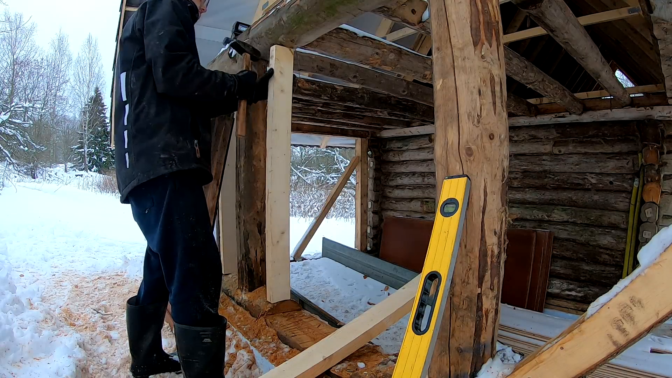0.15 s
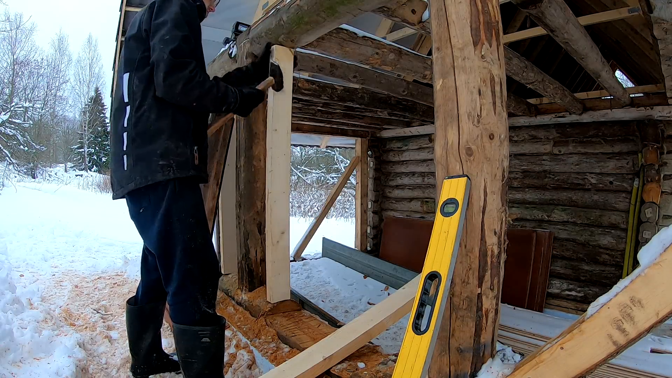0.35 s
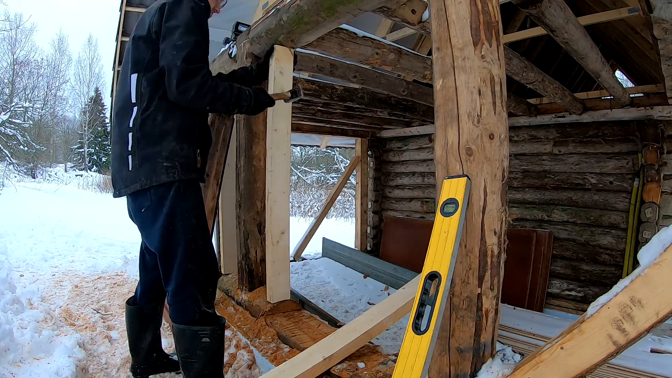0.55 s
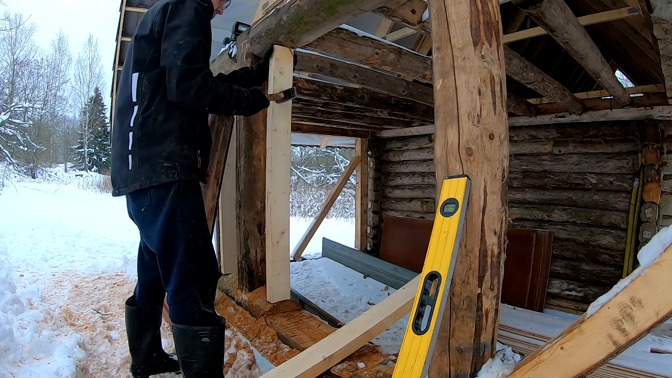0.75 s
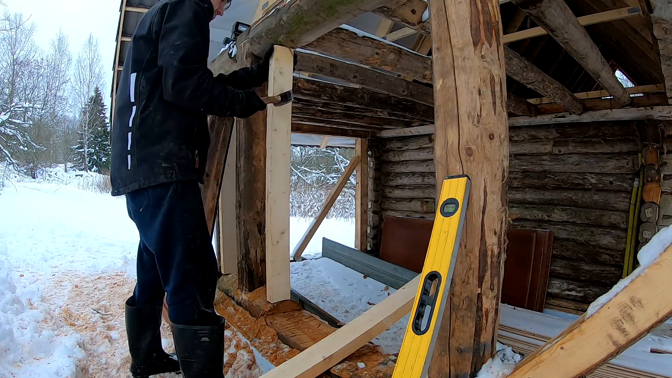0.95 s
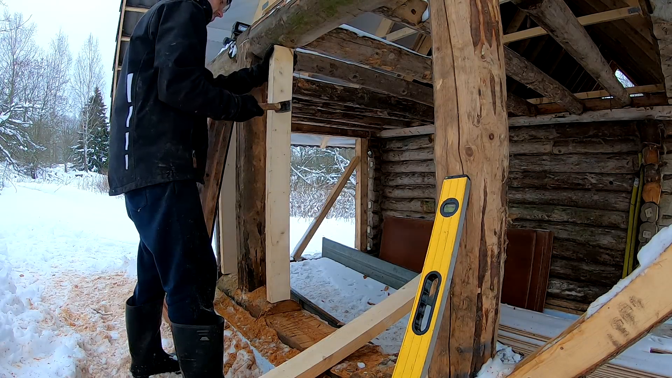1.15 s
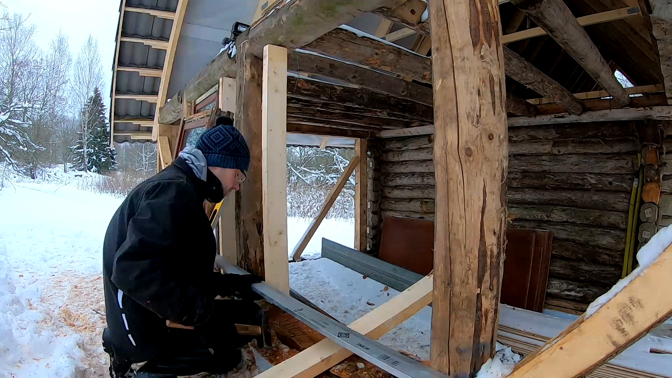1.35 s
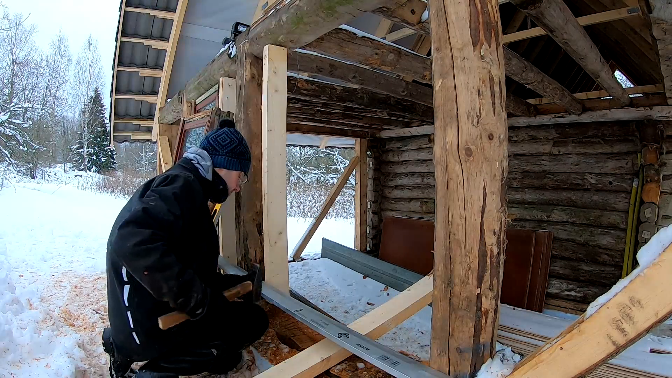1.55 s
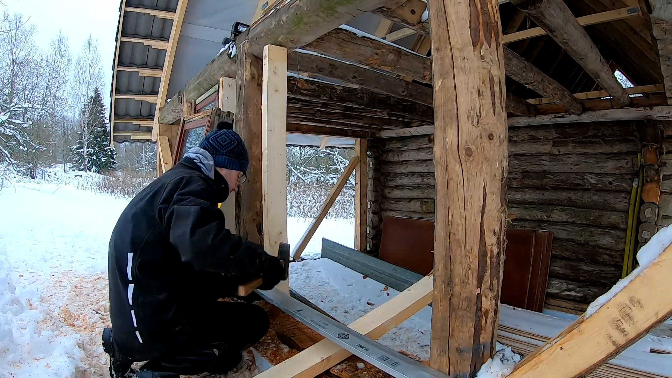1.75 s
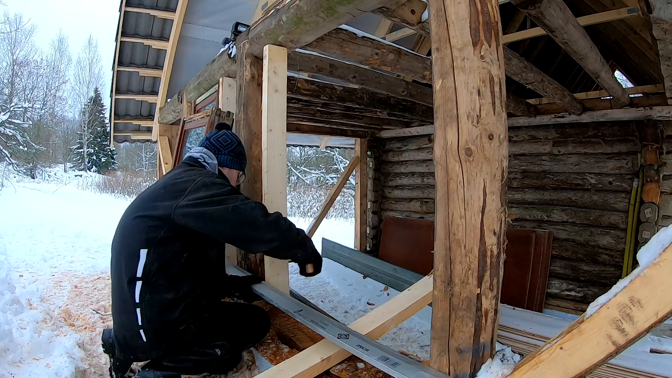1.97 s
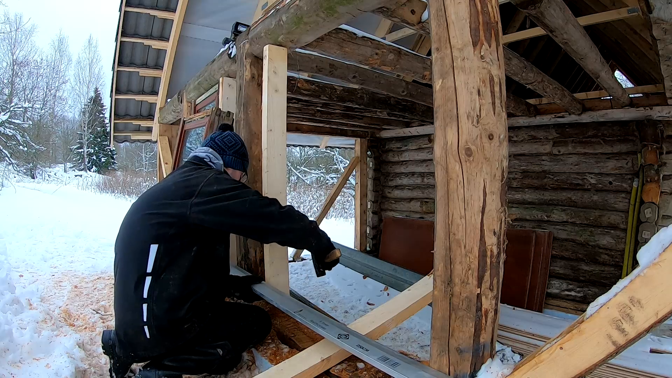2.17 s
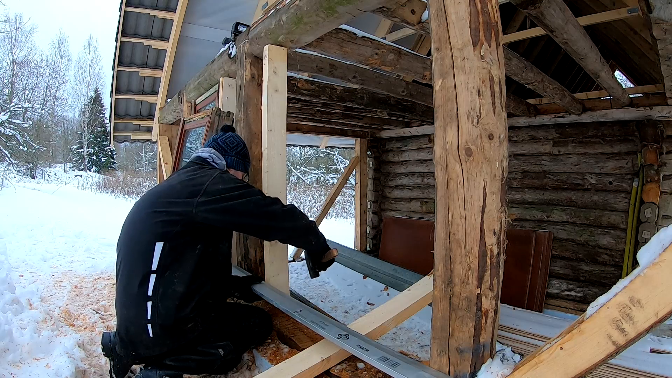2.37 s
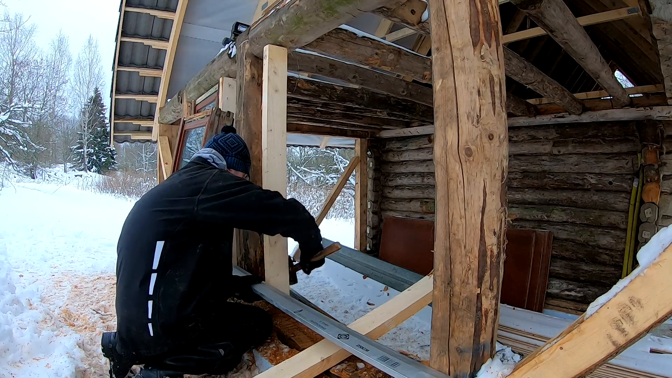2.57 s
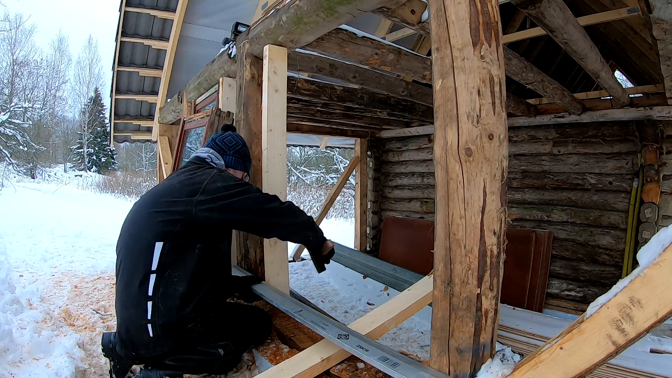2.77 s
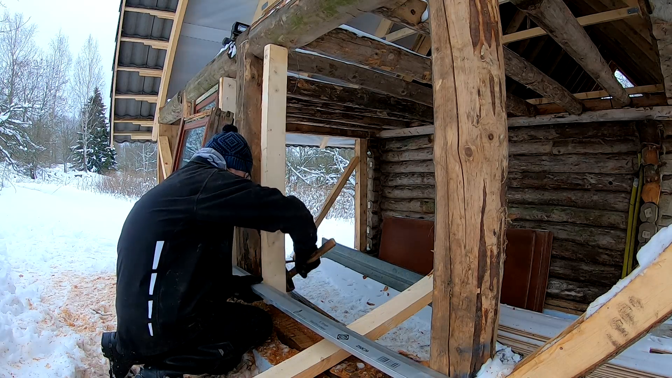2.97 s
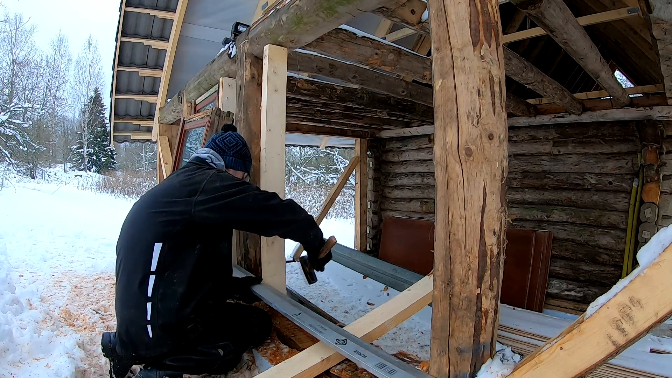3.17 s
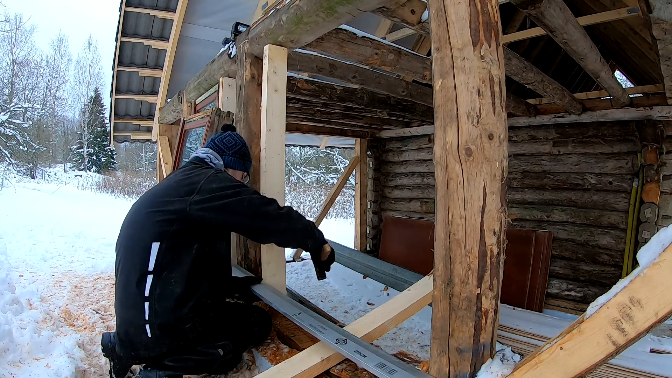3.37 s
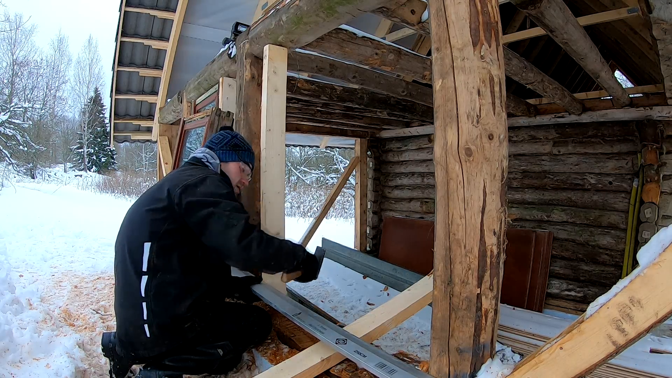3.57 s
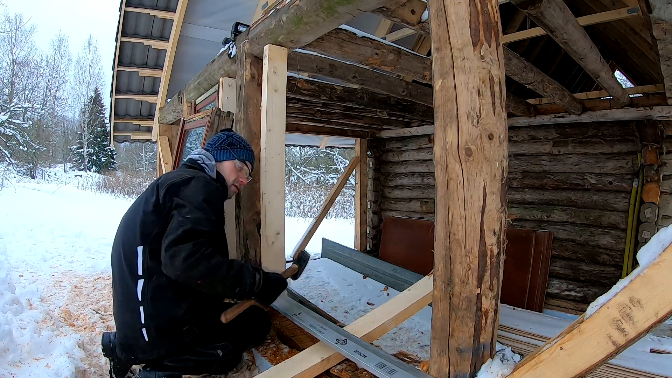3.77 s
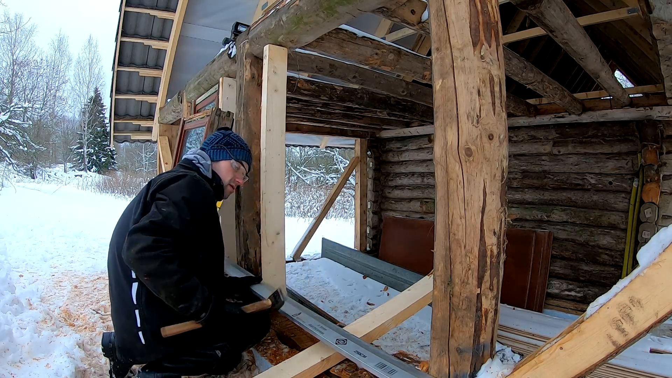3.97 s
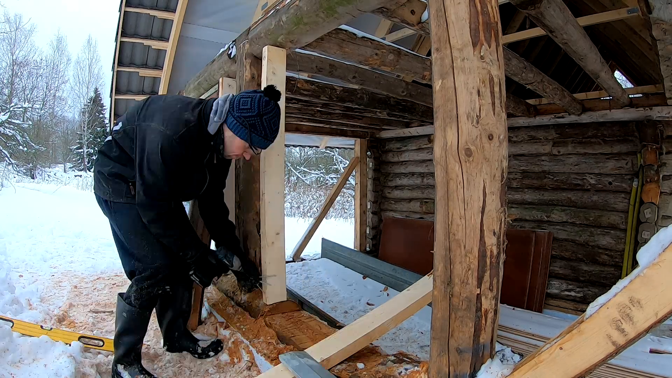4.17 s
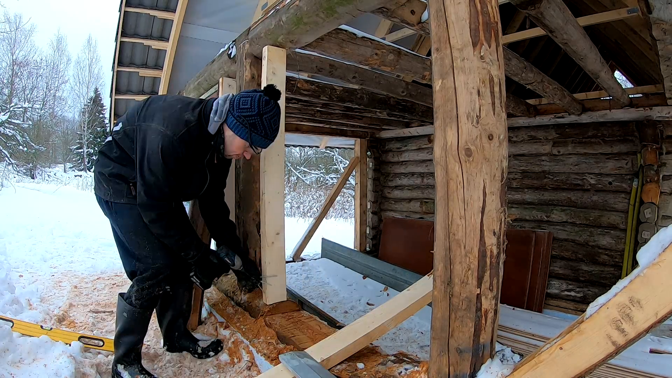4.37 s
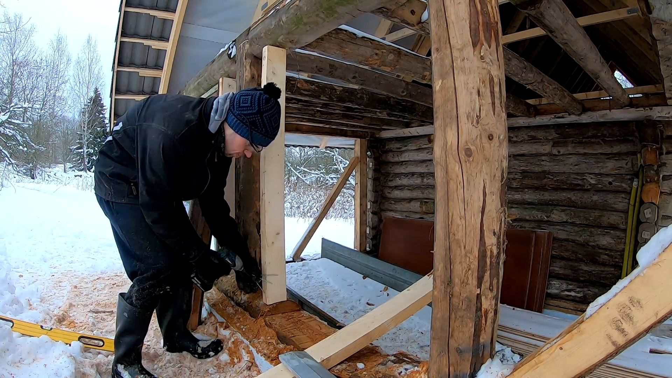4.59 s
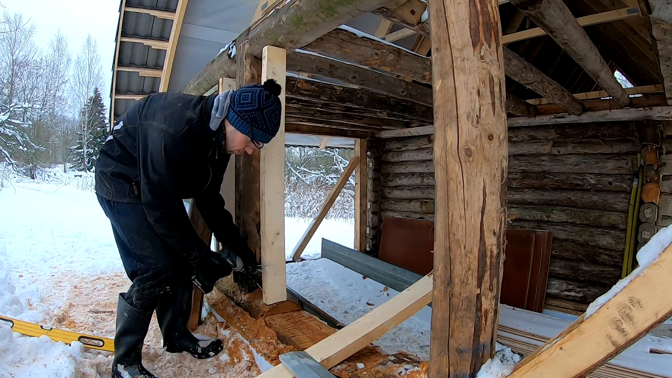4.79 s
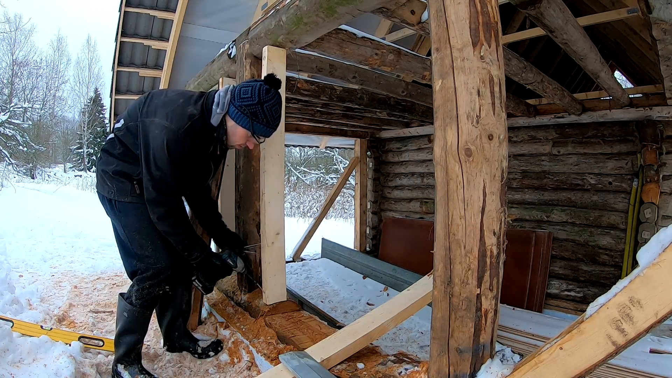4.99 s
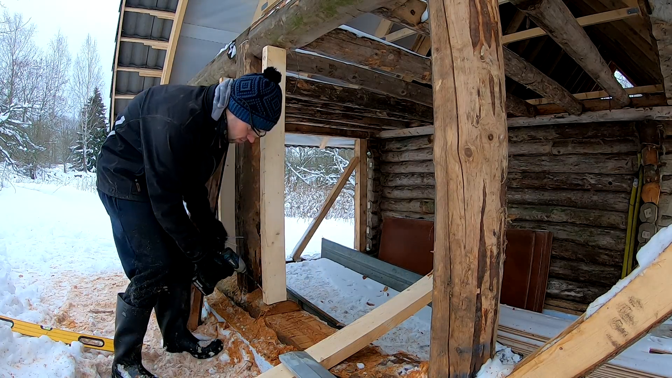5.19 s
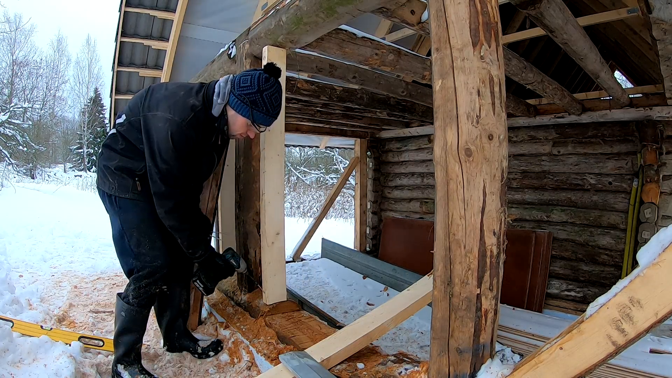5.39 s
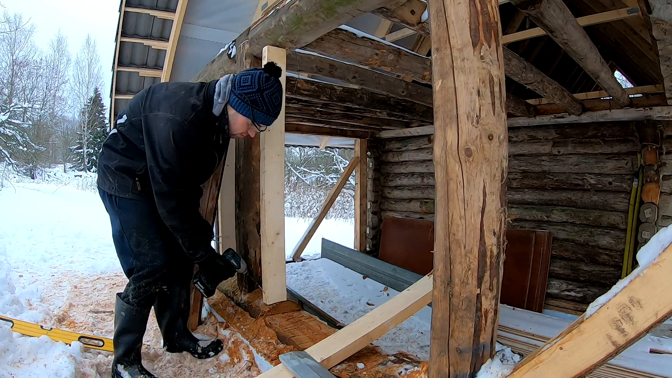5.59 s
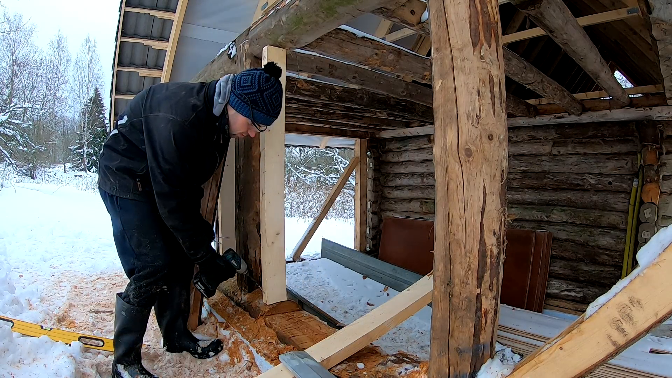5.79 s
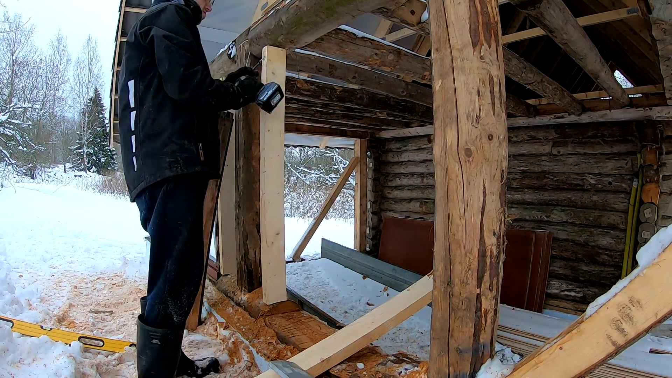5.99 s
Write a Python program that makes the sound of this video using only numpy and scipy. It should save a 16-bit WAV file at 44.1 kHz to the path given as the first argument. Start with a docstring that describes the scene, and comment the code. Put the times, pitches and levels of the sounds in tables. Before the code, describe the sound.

Hammer taps and two heavy blows ring on a timber post, then a cordless impact driver rattles harshly in an open shed with wind rumble.

```python
"""An open log shed, heard through a two-port microphone, where a timber post is hammered into place.
Two light taps and two heavy blows, with small knocks between, ring decaying timber modes and shed noise.
Then a cordless impact driver rattles with a saw-like rasp: repeated strikes and gear noise through
wood resonances, in one long run and the start of another. Shaped noise makes the wind rumble on the
microphone, the swish of a winter jacket as the builder moves, and hollow gliding rushes."""
import sys
import numpy as np
from scipy import signal
from scipy.fft import rfft, irfft, next_fast_len
from scipy.io import wavfile
from scipy.ndimage import uniform_filter1d, map_coordinates

SR = 44100
rng = np.random.default_rng(int(sys.argv[2]) if len(sys.argv) > 2 else 0)


def materialize(psi):
    """Save the field psi as 16-bit PCM at rate SR to the path in sys.argv[1].

    A 1-D psi becomes a single channel; in a 2-D psi each row is a channel.
    """
    bounded = np.clip(np.atleast_2d(psi).T, -1, 1)
    quanta = np.round(bounded * 32767).astype(np.int16)
    wavfile.write(sys.argv[1], SR, quanta)


N = 266364

# how the two microphone ports differ: (time [s], left-right level of the wind [dB], unlike share [0-1])
PORTS = [(0, 11, 1), (.7, 7, 1), (1.36, 3, 1), (1.42, 0, 0)]
RESTART_S = 5.953  # the driver's gears spin up again
REBOUND_S, REBOUND_DB = 0.0025, -5  # the tool's hammer bounces once on the anvil


def amp(db):
    """Decibels to amplitude."""
    return 10 ** (np.asarray(db) / 20)


def unit(x):
    """Scale to rms 1."""
    return x / np.sqrt(np.mean(x ** 2) + 1e-20)


def along(points, hz):
    """Read (frequency [Hz], value) points on a log frequency axis."""
    f, v = np.transpose(points)
    return np.interp(np.log(hz + 1), np.log(f + 1), v)


def curves(rows):
    """One value per sample for each column after the time."""
    s, *cols = np.transpose(rows)
    return [np.interp(np.arange(N) / SR, s, c) for c in cols]


def add(track, s, sound):
    """Lay a sound into a track at a time."""
    room = track[..., max(round(s * SR), 0):][..., :sound.shape[-1]]
    room += sound[..., :room.shape[-1]]


def filtered(x, gain):
    """Multiply the spectrum of x by a gain of frequency."""
    m = next_fast_len(x.shape[-1] + 8192, True)
    spectrum = rfft(x, m) * gain(np.fft.rfftfreq(m, 1 / SR))
    return irfft(spectrum, m)[..., :x.shape[-1]]


def high_pass(x, corner_hz):
    """Keep what lies above the corner."""
    return filtered(x, lambda f: f ** 3 / (f ** 3 + corner_hz ** 3))


def body(x, gain_db, size=16384):
    """Pass x through a causal, minimum-phase body with the given dB response."""
    log_gain = np.maximum(gain_db(np.fft.rfftfreq(size, 1 / SR)), -120) * np.log(10) / 20
    cepstrum = irfft(log_gain)
    # folding the cepstrum forward in time makes the response causal
    cepstrum[1:size // 2] *= 2
    cepstrum[size // 2 + 1:] = 0
    response = irfft(np.exp(rfft(cepstrum)))
    return signal.fftconvolve(np.atleast_2d(x), response[None], axes=1)[:, :x.shape[-1]]


def noise(spectrum):
    """Coloured noise of rms 1."""
    return unit(filtered(rng.standard_normal(N), lambda hz: amp(along(spectrum, hz))))


def flutter(rate):
    """A smooth random curve, rate knots a second."""
    knots = rng.standard_normal(int(N * rate / SR) + 4)
    return map_coordinates(knots, [np.arange(N) * rate / SR])


def grit(size):
    """Fast random unevenness of rms 1, with grains so many samples long."""
    return unit(uniform_filter1d(rng.standard_normal(N), size=size))


def swell(s, spread_s):
    """A smooth bell-shaped rise and fall of height 1 around a time."""
    return np.exp(-.5 * ((np.arange(N) / SR - s) / spread_s) ** 2)


def wind(buffet_db=2, lumpy_db=2.0):
    """A breeze with short gusts buffets the microphone, at first mostly on the left port, later alike on both."""
    # the breeze: (time [s], rumble level [dB])
    breeze = [(0, -36), (1.0, -33), (2.3, -36), (3.3, -36), (4.15, -30), (5.05, -47), (5.8, -45.5),
              (6.04, -39)]
    # short gusts: (time [s], spread [s], lift [dB])
    gusts = [(0.66, 0.03, 7), (0.821, 0.031, 10), (1.369, 0.02, 7), (2.011, 0.023, 11), (2.567, 0.026, 9.5),
             (3.534, 0.038, 4), (3.93, 0.032, 3.5), (5.89, 0.075, 7)]
    # brief dips of the rumble: (time [s], change [dB])
    dips = [(0.983, -17), (1.466, -5.5), (2.88, -11.5), (3.15, -26), (4.2, -14)]
    # wind unlike at the two ports: (frequency [Hz], relative level [dB])
    buffet_colour = [(12, -36.5), (20, -5), (48, -2.5), (108, -1.5), (155, -9.5), (195, -16), (298, -23.5),
                     (334, -31.5), (1000, -56.5), (1300, -105), (2200, -120)]
    # rumble common to both ports: (frequency [Hz], relative level [dB])
    rumble_colour = [(12, -35.5), (20, -3.5), (64, 0.5), (146, -3), (213, -8), (326, -25), (437, -25.5),
                     (670, -36.5), (730, -35), (1200, -41.5), (1560, -48.5), (2640, -120)]
    t = np.arange(N) / SR
    # the rumble drops away for a while
    calm = (t > 4.155) & (t < 5.03)
    level = np.where(calm, -51, curves(breeze)[0])
    level = uniform_filter1d(level, size=400)
    level = level + sum(db * swell(s, spread_s) for s, spread_s, db in gusts)
    level = level + sum(db * swell(s, 0.02) for s, db in dips)
    pan, apart = curves(PORTS)
    buffet = amp(buffet_db) * np.sqrt(apart) * np.array([noise(buffet_colour), noise(buffet_colour)])
    rumble = np.sqrt(1 - apart) * noise(rumble_colour)
    return amp(level + lumpy_db * flutter(30) + np.outer([.5, -.5], pan)) * (buffet + rumble)


def jacket(side=0.61, bright_db=-11, crinkle_db=2.5):
    """Sleeves swish as soft cloth noise; a faster sleeve sounds brighter."""
    # arm and body movements: (time of fastest motion [s], spread [s], swish level [dB])
    swishes = [(0.01, 0.088, -62), (0.22, 0.078, -67), (0.485, 0.089, -65), (1.2, 0.16, -81),
               (1.467, 0.079, -69), (1.66, 0.043, -60), (1.778, 0.1, -75), (2.098, 0.19, -66),
               (2.635, 0.066, -57), (3.554, 0.072, -78), (3.792, 0.16, -73.5), (4.13, 0.12, -69.5)]
    # rubbing cloth: (frequency [Hz], relative level [dB])
    cloth_colour = [(410, -39), (700, -7.5), (867, -11), (1530, -10), (3020, -11), (4210, -14.5),
                    (5160, -23.5), (9350, -33.5), (12000, -54), (15600, -90), (22000, -120)]
    still_db = -78  # the cloth never quite rests
    motion = sum((amp(db) * swell(s, spread_s)) ** 2 for s, spread_s, db in swishes)
    speed = np.sqrt(amp(still_db) ** 2 + motion)
    cloth = noise(cloth_colour) + side * curves(PORTS)[1] * np.outer([1, -1], noise(cloth_colour))
    bright = unit(high_pass(cloth, 4700))
    cloth = cloth + amp(bright_db) * np.sqrt(speed / speed.max()) * bright
    return amp(crinkle_db * flutter(36.79)) * speed * cloth


def hollow_rush(attack_s=0.034, release_s=0.018, grain_db=3, grains_per_s=85):
    """A hollow, grainy band of noise swells, glides in pitch and fades."""
    # rushes: (start [s], end [s], from [Hz], to [Hz], width [Hz], level [dB])
    rushes = [(0.36, 0.718, 540, 578, 200, -70.5), (1.551, 1.76, 560, 590, 230, -52),
              (2.689, 2.805, 280.6, 449.7, 75, -31), (2.729, 2.843, 500.4, 620, 130, -39),
              (2.867, 2.94, 480, 415, 70, -45), (3.2, 3.35, 321, 381.6, 70.4, -37),
              (3.349, 3.504, 430, 580, 65.3, -41), (3.261, 3.478, 580, 800, 150, -48),
              (3.501, 3.662, 800, 830, 130, -54.5), (3.75, 3.88, 790, 848, 160, -50),
              (4.042, 4.148, 400, 519, 140, -47)]
    # shape of the band: (distance from its centre [widths], relative level [dB])
    skirt = [(0, -0.5), (0.7, -3), (1.5, -14), (3, -22), (7, -32.5), (20, -84.5)]
    out, t = np.zeros(N), np.arange(SR // 2) / SR
    for start_s, end_s, from_hz, to_hz, width_hz, db in rushes:
        length_s = end_s - start_s
        pair = rng.standard_normal((2, len(t)))
        real, imaginary = filtered(pair, lambda f: amp(np.interp(f / width_hz, *np.transpose(skirt))))
        band = real + 1j * imaginary
        centre_hz = from_hz * (to_hz / from_hz) ** np.minimum(t / length_s, 1)
        # the slow noise band is carried up to its gliding centre
        carrier = np.exp(2j * np.pi * np.cumsum(centre_hz) / SR)
        rise = np.sqrt(np.clip(t / attack_s, 0, 1))
        fall = np.clip(.5 + (length_s - t) / release_s, 0, 1)
        add(out, start_s, amp(db) * rise * fall * unit(np.real(band * carrier)))
    return amp(grain_db * flutter(grains_per_s)) * out


def shed_tail():
    """Dense ringing of the log walls: noise that dies away band by band, the bass lasting longest."""
    # the shed: (frequency [Hz], time to fall 60 dB [s])
    decay = [(150, 0.73), (400, 0.34), (1000, 0.27), (3000, 0.29), (10000, 0.19)]
    hz, t, z = signal.stft(rng.standard_normal(SR // 2), SR, nperseg=256)
    fading = z * amp(-60 * t / along(decay, hz)[:, None])
    return signal.istft(fading, SR, nperseg=256)[1][:SR // 2]


def contact(s, colour_db, ring_db, push_db=12, crack_db=-2, crack_t60=0.1, modes_db=-19, tail_db=-7, side_db=-13):
    """One contact is a push and a short crack; the post's modes and the shed ring on."""
    # what the post and frame ring with: (frequency [Hz], level [dB], time to fall 60 dB [s])
    timber = [(193.9, 2, 0.47), (321, -11, 0.2), (369.7, -10, 0.32), (435, -0.5, 0.29), (516, -4.5, 0.17),
              (590, -7.5, 0.17), (652, -7.5, 0.089), (768, -1, 0.033), (774, -15.5, 0.28), (922, -11, 0.25),
              (985, -11, 0.041), (1182, -8, 0.29), (1335, -2.5, 0.15), (1530, -3, 0.089),
              (1847, -1.5, 0.076), (2200, 3, 0.059), (2440, -6, 0.091), (3170, -8, 0.35), (3280, -5.5, 0.3)]
    t = np.arange(SR // 2) / SR
    hz, mode_db, t60 = np.transpose(timber)[:, :, None]
    scatter_db = rng.normal(0, 1.94, hz.shape)
    modes = np.sum(amp(mode_db + scatter_db - 60 * t / t60) * np.sin(2 * np.pi * hz * t), 0)
    blow = amp(crack_db - 60 * t / crack_t60) * rng.standard_normal(len(t))
    blow[0] += amp(push_db)
    # the post speaks at once with half of ring_db, then settles to one and a half times it
    blow += amp(modes_db + ring_db * (1.5 - np.exp(-t / 0.02))) * modes
    # the shed takes a few milliseconds to join in
    blow += amp(tail_db + ring_db) * (1 - np.exp(-t / 0.0063)) * shed_tail()
    port_s, _, apart = np.transpose(PORTS)
    walls = amp(side_db) * np.interp(s, port_s, apart) * np.outer([1, -1], shed_tail())
    return body(blow + walls, colour_db)


def hammer(knock_t60=0.046, knock_attack_s=0.0011):
    """Hammer blows on the post; a harder one is brighter, and each spot has its own brief hollow knock."""
    # blows: (time [s], level [dB], hardness [dB], ring-on [dB], shed [dB], knock [Hz], knock level [dB])
    blows = [(0.753, -2, 1, -6, -13, 678, -11.5), (1.029, -7.5, 3.5, -4.5, -11.5, 1337, -23),
             (2.549, 1.5, -9.5, -1.5, -9, 412, -6), (2.562, -1, -5.5, -9.5, -6, 687, -21),
             (2.577, 3, -17.5, -1, -7, 213, -9.5), (3.002, -2, 18, 2, -4, 613, -15),
             (3.014, -2.5, 3.5, 1.5, -3.5, 400, -17), (3.119, -8, 13.5, -7.5, -11.5, 586, -25)]
    # a blow on the post: (frequency [Hz], relative level [dB])
    colour = [(50, -21.5), (130, -15.5), (200, 0), (400, 1.5), (780, -2), (1050, -12), (1300, -16),
              (1700, -22), (4500, -38.5), (9000, -56.5), (12500, -63.5), (14000, -75)]
    # where a harder blow gains: (frequency [Hz], share of the hardness [ratio])
    hardening = [(600, 0.018), (1500, 0.9), (8000, 1.08), (13000, 0.8)]
    out, t = np.zeros((2, N)), np.arange(SR // 2) / SR
    for s, db, hard_db, ring_db, shed_db, knock_hz, knock_db in blows:
        envelope = amp(knock_db - 60 * t / knock_t60) * (1 - np.exp(-t / knock_attack_s))
        knock = envelope * np.sin(2 * np.pi * knock_hz * t)
        colour_db = lambda f: db + along(colour, f) + hard_db * along(hardening, f)
        # contact adds ring_db to its tail, so it is taken off here
        blow = contact(s, colour_db, ring_db, crack_t60=0.071, tail_db=shed_db - ring_db)
        add(out, s, knock + blow)
    return out


def handling():
    """Dull bumps and the small trigger clicks of the driver ring the same timber."""
    # hands, knees and tools bump the timber: (time [s], level [dB], hardness [dB])
    bumps = [(0.820, -11, -6), (1.510, -6.5, -20), (1.526, -27, 31), (1.596, -1, -6), (1.639, -11, 0),
             (1.726, -11, -1), (1.769, -11.5, -3), (1.924, -13.5, 3), (2.001, -10, 9), (2.176, -14, -8),
             (2.468, -6, -10), (2.848, -44.5, 48), (3.201, -5, -20), (3.894, -17.5, 5),
             (4.028, -25.5, 23.5), (4.064, -31, 31), (4.097, -37, 27), (4.131, -19, 15.5)]
    # a bump: (frequency [Hz], relative level [dB])
    bump_colour = [(50, -27.5), (130, -6), (210, 4.5), (400, -6.5), (760, -19), (1050, -34), (1300, -35),
                   (1700, -39.5), (4500, -58), (9000, -78), (14000, -93)]
    # where a harder bump gains: (frequency [Hz], share of the hardness [ratio])
    bump_hardening = [(400, 0.061), (760, 0.57), (1700, 1), (4500, 0.84)]
    # the driver's trigger clicks as it starts and stops: (time [s], level [dB])
    clicks = [(4.170, -31.5), (4.228, -30), (4.245, -17.5), (5.867, -34), (5.931, -31)]
    # a click: (frequency [Hz], relative level [dB])
    click_colour = [(50, -52), (200, -10), (400, 0), (760, -11.5), (1700, -3.5), (4500, -5.5), (9000, -23),
                    (14000, -33)]
    out = np.zeros((2, N))
    for s, db, hard_db in bumps:
        colour_db = lambda f: db + along(bump_colour, f) + hard_db * along(bump_hardening, f)
        add(out, s, contact(s, colour_db, ring_db=-7.5))
    for s, db in clicks:
        colour_db = lambda f: db + along(click_colour, f)
        add(out, s, contact(s, colour_db, ring_db=0.5))
    return out


def shuffle(from_s=1.5, to_s=2.5, level_db=-47, scatter_db=3.0, t60=0.12, count=60):
    """Faint, dull scuffs, each a decaying burst of noise, while the builder crouches at the post."""
    # scuffing: (frequency [Hz], relative level [dB])
    colour = [(60, -3.5), (200, 13.5), (300, -4), (450, -9), (700, -28), (1300, -42.5), (3000, -48.5),
              (8000, -74.5)]
    t, envelope = np.arange(SR // 4) / SR, np.zeros(N)
    for s in np.linspace(from_s, to_s, count, endpoint=False):
        scuff_s = s + rng.uniform(0, (to_s - from_s) / count)
        add(envelope, scuff_s, amp(rng.normal(0, scatter_db) - 60 * t / t60))
    scuffs = body(envelope * rng.standard_normal(N), lambda f: along(colour, f))
    return amp(level_db) * unit(scuffs)


def scrape(grain_db=2, splinter_db=2):
    """The first heavy blow drives the post over the sill with a gritty hiss of uneven noise."""
    # the post skids on the sill: (time [s], level [dB])
    skid = [(2.549, -44), (2.567, -34), (2.612, -34), (2.66, -41.5), (2.75, -61.5), (2.85, -80)]
    # the hiss: (frequency [Hz], relative level [dB])
    colour = [(590, -36.5), (1000, -3.5), (2210, -7.5), (2410, -5), (2800, -8.5), (3330, -5.5), (4490, -12),
              (6760, -29), (12500, -48.5), (14000, -60)]
    level = amp(curves(skid)[0]) * (np.arange(N) / SR > skid[0][0])
    grains = rng.standard_normal(N) * amp(grain_db * grit(size=90) + splinter_db * grit(size=12))
    return level * unit(filtered(grains, lambda hz: amp(along(colour, hz))))


def clink(level_db=-36):
    """A short steely ring as the hammer's head lands again on the rebound of the second heavy blow."""
    # the steel head: (frequency [Hz], relative level [dB], time to fall 60 dB [s])
    steel = [(1297, -5, 0.2), (1480, 0, 0.15), (1750, -4, 0.092), (2487, -6, 0.11), (2700, 6.5, 0.11),
             (2800, 2, 0.066), (3070, -5, 0.11), (4040, -15, 0.17), (5800, -16, 0.11)]
    out, t = np.zeros(N), np.arange(SR // 3) / SR
    add(out, 3.12, sum(amp(db - 60 * t / t60) * np.sin(2 * np.pi * hz * t) for hz, db, t60 in steel))
    return amp(level_db) * out


def spin_up(start_s, attack_s, rise_db):
    """Gain of a motor that starts at a time and climbs to full effort."""
    t = np.arange(N) / SR - start_s
    return (t >= 0) * amp(-rise_db * np.clip(1 - t / attack_s, 0, 1))


def impacts(hits, effort, strike_db=11.5, snap_db=3, strike_hz=2900, slip_db=8.02, slip_s=0.007, slip_hz=7000,
            ping_db=6, ping_hz=8100, ring_db=-7, ring_t60=0.2, scatter_db=-12, whirr_db=-3.5, whirr_hz=800):
    """The tool's hammer cracks on its anvil, rebounds and slips with a ping; timber rings, gears rasp."""
    t = np.arange(SR // 8) / SR
    out = np.zeros((2, N))
    fresh = lambda: rng.standard_normal((2, len(t)))
    # nearly the same broad ring answers every strike, so the low notes stack up on the strike rate
    decay = amp(-60 * t / ring_t60)
    ring = fresh() * decay
    for _ in range(2):  # level its spectrum, then let it decay again
        ring = irfft(np.exp(1j * np.angle(rfft(ring))), len(t)) * decay ** .25
    ring = amp(ring_db) * unit(ring) * np.sqrt(np.mean(decay ** 2))
    for s, db in hits:
        add(out, s, amp(db) * (ring + amp(scatter_db + ring_db) * decay * fresh()[:1]))
        rebound_s = REBOUND_S * rng.uniform(.7, 1.3)
        for delay_s, loss_db in [(0, 0), (rebound_s, REBOUND_DB)]:
            crack = amp(-60 * t / .014) * fresh()
            # a one-sample snap on top of the crack
            crack[:, 1] += amp(snap_db + rng.normal(0, 3))
            level = amp(db + strike_db + loss_db + rng.normal(0, 1.0))
            add(out, s + delay_s, level * high_pass(crack, strike_hz * rng.lognormal(0, .12)))
        this_ping_hz, phase = ping_hz * rng.lognormal(0, .07), rng.uniform(0, 2 * np.pi, (2, 1))
        ping = amp(ping_db - 60 * t / .006) * np.sin(2 * np.pi * this_ping_hz * t + phase)
        slip = ping + amp(slip_db - 60 * t / .018) * high_pass(fresh(), slip_hz)
        add(out, s + slip_s + rng.normal(0, .0005), amp(db + rng.normal(0, 2.5)) * slip)
    rasp = unit(rng.standard_normal((2, N)) * amp(2.4 * grit(size=40)))
    return out + amp(whirr_db) * effort * high_pass(rasp, whirr_hz)


def tool_body(x, colour, peaks):
    """Broad colour of the tool on the wood, with its resonances on top."""
    def gain_db(f):
        lifts = sum((amp(db) - 1) / (1 + (2 * (f - hz) / width) ** 2) for hz, width, db in peaks)
        return along(colour, f) + 20 * np.log10(1 + lifts)
    return body(x, gain_db)


def screw_ring(hits):
    """Every strike rings the screw and bit, each time with a new balance of modes."""
    # close modes that beat after each strike: (frequency [Hz], level [dB], time to fall 60 dB [s])
    screw_modes = [(2840, -21.5, 0.1), (2858, -20, 0.12), (2906, -20.5, 0.11), (2980, -18.5, 0.1),
                   (3060, -22, 0.08), (3076, -17.5, 0.15)]
    # how much the screw sings, most of all at the end: (time [s], level [dB])
    singing = [(4.25, -3), (4.42, -6), (4.53, -14), (4.7, -0.5), (5.2, -0.5), (5.85, 2)]
    out, t = np.zeros(N), np.arange(SR // 4) / SR
    hz, mode_db, t60 = np.transpose(screw_modes)[:, :, None]
    modes = amp(mode_db - 60 * t / t60) * np.sin(2 * np.pi * hz * t)
    for s, db in hits:
        balance = amp(db + rng.normal(0, 1.5, len(screw_modes)))
        add(out, s + REBOUND_S / 2, balance @ modes)
    return amp(curves(singing)[0]) * out


def long_run(level_db=-20, jitter_s=.00017, run_db=6.5):
    """A screw goes in at the foot of the post; the rattle quickens and its resonances shift as it tightens."""
    # the driver's pace: (time [s], impacts a second [1/s])
    pace = [(4.2501, 34.06), (4.35, 33.73), (4.6, 35.44), (4.9, 37.08), (5.2, 38.87), (5.5, 39.72),
            (5.86, 39.69)]
    # driving at the foot of the post: (frequency [Hz], relative level [dB])
    colour = [(30, -27), (70, -0.5), (118, 3), (155, -6), (193, 5.5), (260, 3), (700, -2), (1050, -4),
              (1300, -1.5), (2620, -4), (2950, 2.5), (3200, -3), (3600, -4), (6000, -11), (9600, -19.5),
              (11300, -21), (12800, -22), (14200, -28.5)]
    # tool, screw and timber: (frequency [Hz], width [Hz], lift with screw loose [dB], lift with it tight [dB])
    peaks = [(191.7, 11.2, 14, 15), (218, 14, 12.5, 10), (289, 10, 7.5, 12), (375, 36, 4, 4.5),
             (621, 103, 8, 4), (782.7, 13.7, 10, 14), (910, 13, 9.5, 14.5), (978, 16, 6, 8.5),
             (1154, 16, 12, 7.5), (1192, 13.2, 16, 9.5), (1604, 148, 8, 1.5), (1982, 47, 6, 9),
             (2410, 34, 8.5, 7), (4910, 105, 4.5, 5), (5330, 34, 7.5, 7.5), (5740, 55, 4.5, 7.5),
             (7280, 180, 7, 5), (9770, 1040, 8, 6.5)]
    # the screw pulls tight: (time [s], tightness [0-1])
    tightness = [(4.75, 0.12), (5.15, 0.82)]
    # the post's low boom: (time [s], level [dB])
    boom_level = [(4.27, 5), (4.41, 3), (4.47, -9.5), (4.57, -6), (4.72, -2.5), (5.1, 0), (5.58, 1),
                  (5.68, -7), (5.85, -5)]
    # how alike the two ports hear it: (frequency [Hz], likeness [0-1])
    likeness = [(60, 1), (130, 1), (280, 1), (620, 0.79), (1340, 0.4), (2920, 0.9), (6350, 0.79),
                (13800, 0.092)]
    # balance of the ports: (frequency [Hz], left-right level [dB])
    balance = [(200, 2), (370, -0.5), (670, -4.5), (1230, -0.5), (2250, 0.5), (4120, 0), (7550, -3),
               (13800, 0.5)]
    boom_hz, bite_hz, half_width_octaves = 191, 358, 0.31
    stop_s, stop_drop_db, stop_db_per_s = 5.853, 13.5, 435
    coast_db, coast_db_per_s, coast_hz = -34, 109, 4350

    t = np.arange(N) / SR
    running = (t > pace[0][0]) * (t < pace[-1][0])
    turns = np.cumsum(curves(pace)[0] * running) / SR
    times = t[1:][np.diff(np.floor(turns)) > 0]
    hits = [(s + rng.normal(0, jitter_s), run_db) for s in times]
    effort = amp(run_db) * spin_up(pace[0][0], attack_s=0.013, rise_db=21) * (t < RESTART_S)
    # the screw rings only in the first row, which becomes the middle of the stereo image
    drive = impacts(hits, effort) + np.outer([1, 0], screw_ring(hits))
    loose = tool_body(drive, colour, [(hz, width, db) for hz, width, db, _ in peaks])
    tight = tool_body(drive, colour, [(hz, width, db) for hz, width, _, db in peaks])
    pair = loose + np.clip(curves(tightness)[0], 0, 1) * (tight - loose)

    def band(centre_hz):
        octaves = lambda f: np.log2((f + 1) / centre_hz)
        return filtered(pair, lambda f: np.exp(-.5 * (octaves(f) / half_width_octaves) ** 2))

    boom_change = (amp(curves(boom_level)[0]) - 1) * band(boom_hz)
    # the wood knocks more hollowly as the screw first bites
    bite_change = (amp(6 * swell(4.33, 0.07)) - 1) * band(bite_hz)
    pair = pair + boom_change + bite_change

    # the level drops sharply at once and the ring dies away fast; the gears coast, dull and dying away
    stopped_s = np.maximum(t - stop_s, 0)
    choked = amp(-stop_drop_db - stop_db_per_s * stopped_s) * pair
    coast = amp(coast_db - coast_db_per_s * stopped_s) * (pair - high_pass(pair, coast_hz))
    pair = np.where(t < stop_s, pair, choked + coast)

    # bass arrives alike at both ports, the top treble nearly unrelated
    turn = lambda f: np.arccos(np.clip(along(likeness, f), -1, 1)) / 2
    mid, side = filtered(pair, lambda f: np.array([np.cos(turn(f)), np.sin(turn(f))]))
    ports = np.array([mid + side, mid - side])
    return amp(level_db) * filtered(ports, lambda f: amp(np.outer([.5, -.5], along(balance, f))))


def second_run(level_db=-10, whirr_effort_db=7):
    """The next screw bites at the head of the post, which booms near 200 and 430 Hz."""
    # first impacts at the top of the post: (time [s], relative level [dB])
    hits = [(5.9545, -3.5), (5.9838, 5.5), (6.0112, 4.5), (6.038, 4.5)]
    # driving at the head of the post: (frequency [Hz], relative level [dB])
    colour = [(35, -39), (60, -15), (122, -27), (202, 0.5), (349, -11), (429, 12), (1020, -6.5),
              (1810, -11.5), (2670, -9), (3290, -17), (3520, -8), (12100, -46.5), (14200, -45)]
    # resonances of tool, screw and timber: (frequency [Hz], width [Hz], lift [dB])
    peaks = [(198, 66, 15), (766, 55, 5.5), (1990, 67, 10), (2650, 99, 7), (2930, 130, 8.5), (3500, 91, 7)]
    effort = amp(whirr_effort_db) * spin_up(RESTART_S, attack_s=0.015, rise_db=29)
    drive = impacts(hits, effort, snap_db=5, strike_hz=1800, ping_db=5, ring_db=-8.5, whirr_db=-4.5)
    return amp(level_db) * tool_body(drive[0], colour, peaks)


def scene():
    """Everything heard at the microphone, summed."""
    post = hammer() + handling() + shuffle() + clink() + scrape()
    driver = long_run() + second_run()
    return post + driver + wind() + jacket() + hollow_rush()


def record(dry, ceiling=.58, top_hz=14100):
    """The recorder rounds off the highest peaks and keeps almost nothing above its band limit."""
    rounded = dry / (1 + (np.abs(dry) / ceiling) ** 6) ** (1 / 6)
    return filtered(rounded, lambda hz: 1 / (1 + (hz / top_hz) ** 200))


dry = scene()
out = record(dry)
materialize(out)
```